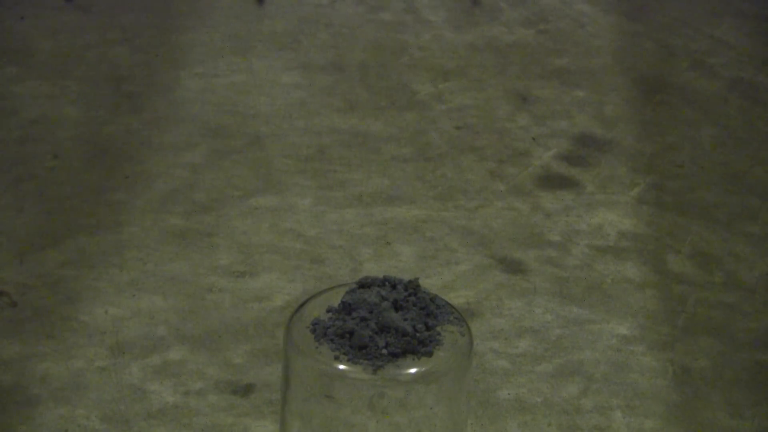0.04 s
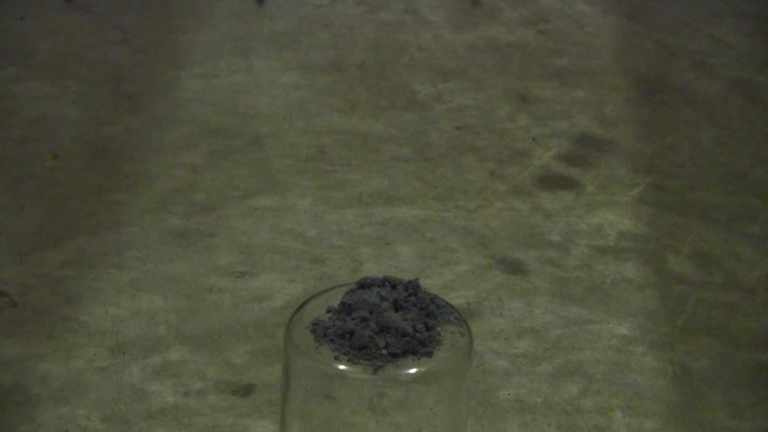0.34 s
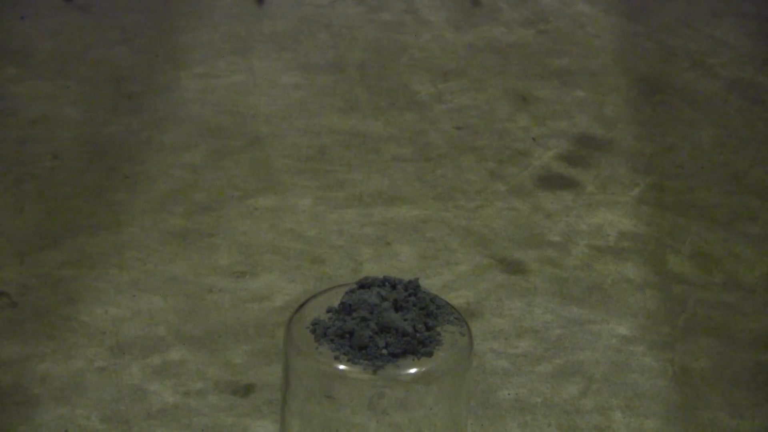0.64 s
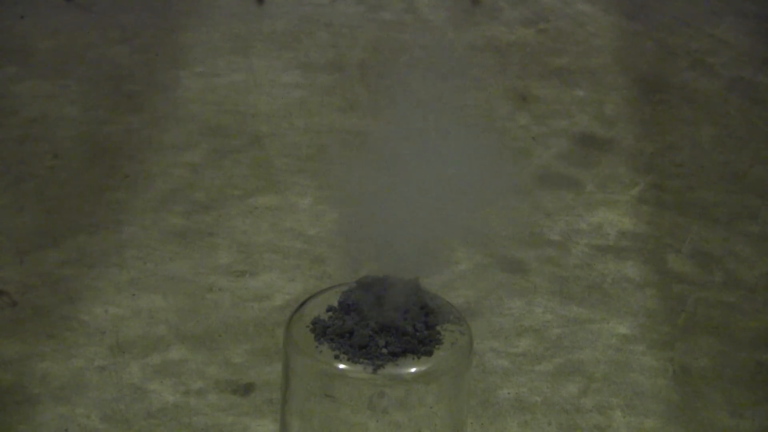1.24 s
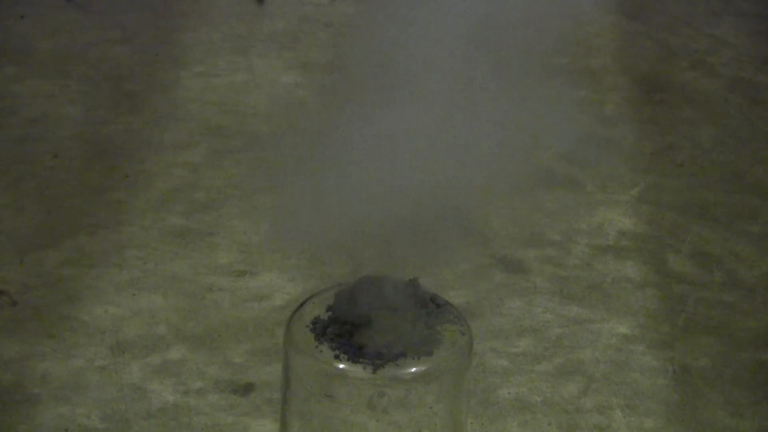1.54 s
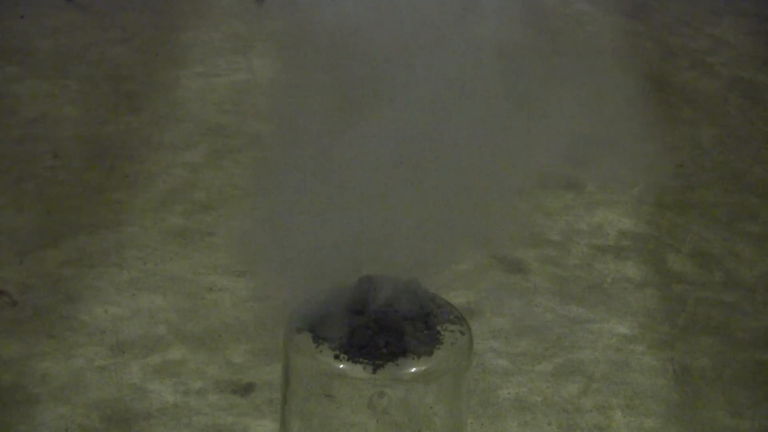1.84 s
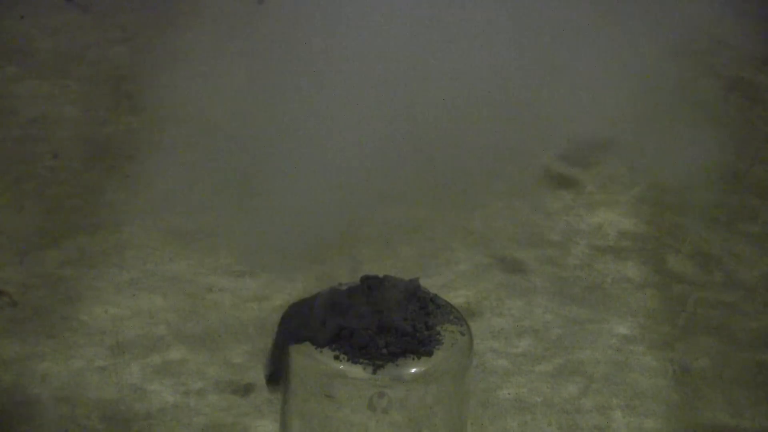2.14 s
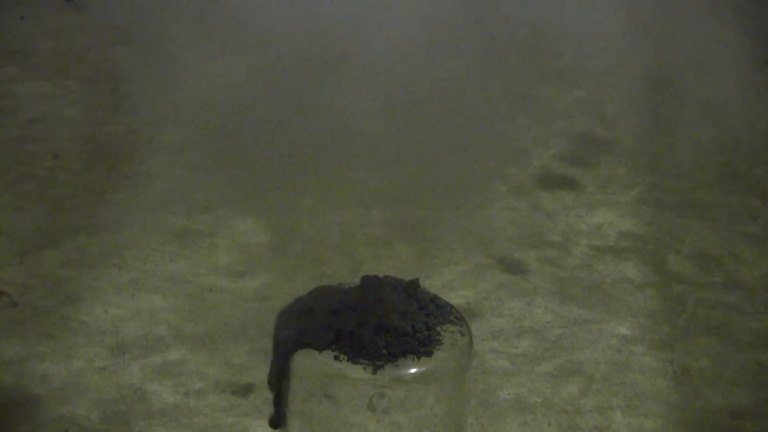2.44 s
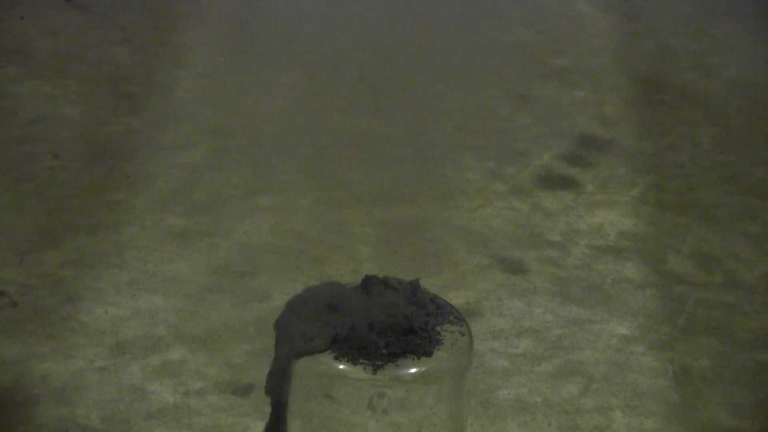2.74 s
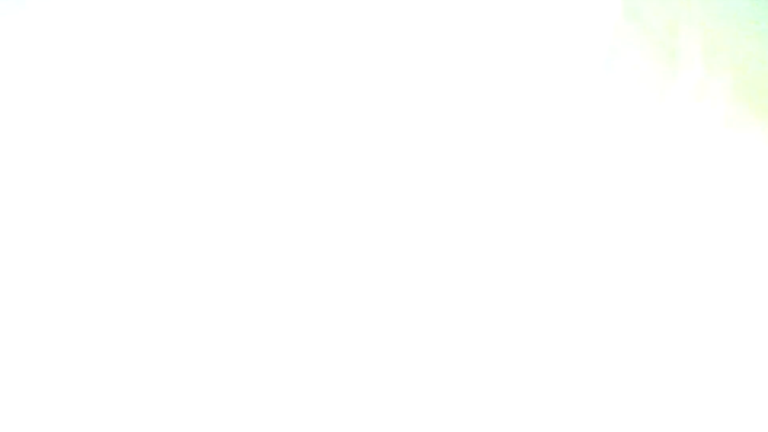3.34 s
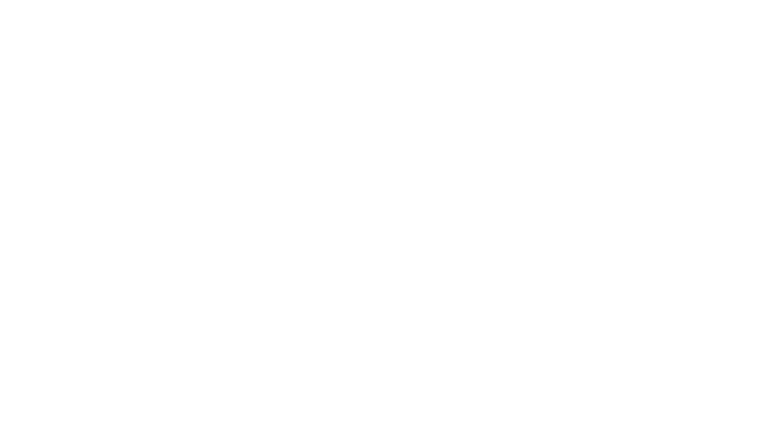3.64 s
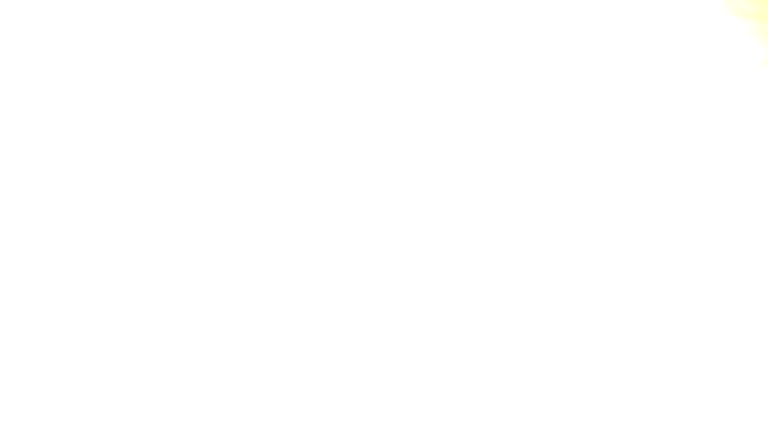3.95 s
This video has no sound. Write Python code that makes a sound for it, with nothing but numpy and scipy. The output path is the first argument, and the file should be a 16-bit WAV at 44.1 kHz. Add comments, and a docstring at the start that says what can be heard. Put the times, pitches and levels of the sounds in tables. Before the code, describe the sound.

Reacting powder sizzles softly and builds, dotted with little pops and one sharp snap. Suddenly it catches fire, rumbling and crackling under a bright rushing hiss. The close walls of a small booth make it sound slightly hollow.

```python
"""A heap of dark powder fizzes and catches fire on an upturned beaker in a hard-walled booth.
Tiny bursting bubbles and escaping vapour grow harder and brighter, dotted with pops and spurts of gas.
At 3.3 s the flame takes over: fluttering turbulence rumbles, roars and spits under a bright jet of hiss,
with a gliding hollow note and one low boom. The booth's resonances and close echoes colour the sound."""
import sys
import numpy as np
from scipy import signal
from scipy.fft import rfft, irfft
from scipy.io import wavfile

SR = 44100
rng = np.random.default_rng(int(sys.argv[2]) if len(sys.argv) > 2 else 0)


def store_wav(level_fs):
    """Save 16-bit WAV to argv[1]."""
    pcm = np.round(np.clip(np.atleast_2d(level_fs), -1, 1) * 32767)
    wavfile.write(sys.argv[1], SR, pcm.T.astype(np.int16))


N = 176400
TIME = np.arange(N) / SR
FREQ = np.maximum(np.arange(N // 2 + 1) * SR / N, 1)
CUTOFF_HZ = 15680

# resonances and hollows of the booth: centre_hz, width_hz, gain_db
BOOTH_MODES = [(166, 35, 5), (415, 26, -6.5), (520, 25, 10), (613, 17, 2), (620, 45, 4), (793, 71, 6),
               (966, 38, 5), (1105, 90, -1), (1605, 230, 4.5), (1950, 280, -2.5), (2374, 67, 6),
               (2890, 200, 2.5), (3040, 150, -5.5), (3530, 130, 3)]


def from_db(db):
    """Decibels to gain."""
    return 10 ** (np.asarray(db) / 20)


def rms_one(x):
    """Scale to rms 1."""
    return x / np.sqrt(np.mean(x ** 2) + 1e-20)


def envelope(rows):
    """Gain over time from rows of time_s, level_db."""
    return from_db(np.interp(TIME, *np.transpose(rows)))


def swell(crest_s, sigma_s):
    """A bell-shaped fade in and out."""
    return np.exp(-((TIME - crest_s) / sigma_s) ** 2 / 2)


def curve(points):
    """Join rows of freq_hz, value on a log frequency axis."""
    hz, value = np.transpose(points)
    return np.interp(np.log(FREQ), np.log(hz), value)


def peaks_db(rows):
    """Resonances and hollows as an EQ curve."""
    return sum(db / (1 + (2 * (FREQ - hz) / width) ** 2) for hz, width, db in rows)


def flutter(rate_hz, depth_db):
    """A random gain that wanders at about the given rate."""
    drift = irfft(rfft(rng.standard_normal(N)) / (1 + (FREQ / rate_hz) ** 2), N)
    return from_db(depth_db * rms_one(drift))


def gas(bursts_per_s, share, spread_db):
    """Smooth turbulence with tiny uneven bursts that carry the given share of its power."""
    sizes = from_db(spread_db * np.minimum(rng.exponential(1, N), 4)) * rng.choice([-1, 1], N)
    bursts = rms_one(sizes * (rng.random(N) < bursts_per_s / SR))
    return np.sqrt(share) * bursts + np.sqrt(1 - share) * rng.standard_normal(N)


def ringing_noise(centre_hz, width_hz):
    """Turbulence ringing in one resonance, whose centre may glide; rms 1."""
    band = irfft(rfft(rng.standard_normal((2, N))) / (1 + (FREQ / width_hz) ** 2) ** 2, N)
    phase = 2 * np.pi * np.cumsum(centre_hz * np.ones(N)) / SR
    return rms_one(band[0] * np.cos(phase) + band[1] * np.sin(phase))


def wall_echoes(x, count=40, near_s=.002, far_s=.02, total_db=-11):
    """Early echoes off the close walls add a fine hollow ripple; rms 1."""
    echoes = np.zeros(N)
    lags = (rng.uniform(near_s, far_s, count) * SR).astype(int)
    echoes[lags] = from_db(total_db) * rng.choice([-1, 1], count) / np.sqrt(count)
    return rms_one(x + irfft(rfft(x) * rfft(echoes), N))


def voiced(drive, colour_db, likeness=None):
    """Give a white source wall echoes, colour and stereo width; rms 1."""
    # default likeness of left and right: freq_hz, correlation
    source_likeness = [(60, 1), (700, 0.96), (2500, 0.95), (5500, 0.8), (8000, 0.66), (10000, 0.46),
                       (12000, -0.041), (14000, 0.63), (15500, -1)]
    # left against right: freq_hz, balance_db
    balance = [(200, 0), (600, -1), (2500, 0), (7000, -0.3), (10000, -2), (12800, 0.8), (15500, 1)]
    alike = np.clip(curve(likeness or source_likeness), -.995, .995)
    mid = np.sqrt(1 + alike) * rfft(wall_echoes(drive))
    side = np.sqrt(1 - alike) * rfft(rng.standard_normal(N))
    channel_eq = from_db(colour_db + curve(balance) * [[.5], [-.5]])
    return rms_one(irfft(np.array([mid + side, mid - side]) * channel_eq, N))


def room_tone(level_db=-56):
    """A quiet, diffuse bed of dull noise."""
    # spectrum of the room: freq_hz, gain_db
    colour = [(25, -25), (60, -17), (130, -5.5), (190, -3.5), (380, 3), (700, 0.5), (1300, -3.5),
              (3000, -16.5), (7000, -27), (15500, -40)]
    # likeness of left and right: freq_hz, correlation
    likeness = [(60, 0.95), (200, -0.53), (1100, -0.44), (3000, 0.14)]
    return from_db(level_db) * voiced(rng.standard_normal(N), curve(colour), likeness)


def spurts():
    """Short, smooth jets of gas swell and fade."""
    # the jets: crest_s, sigma_s, level_db, tilt_db_per_octave
    puffs = [(0.313, .024, -70, 6), (0.367, 0.0016, -56, -1.5), (0.965, 0.017, -48, 1),
             (1.215, 0.022, -46, 2), (1.414, 0.015, -48, -1), (2.286, 0.033, -45, 2.5),
             (2.49, 0.024, -42.5, 4.5), (2.539, 0.015, -36.5, 2.5), (2.887, 0.016, -44.5, -2)]
    # their spectrum before the tilt: freq_hz, gain_db
    colour = [(20, -75), (500, -19), (1000, 1), (1300, 0.5), (2500, -3.5), (4500, -2), (6200, -5.5),
              (8000, -11), (15500, -24.5)]
    out, drive = 0, rng.standard_normal(N)
    for crest_s, sigma_s, db, tilt in puffs:
        rush = voiced(drive, curve(colour) + tilt * np.log2(FREQ))
        out = out + from_db(db) * swell(crest_s, sigma_s) * rush
    return out


def pops(low_cut_hz=132, tail_db=-3, tail_t60_s=.18, size=4096):
    """Gas pockets burst, and after 3.3 s the flame crackles, in heavily damped pulses, each with a short tail
    in the booth."""
    # bursting pockets, and from 3.36 s crackles of the flame: start_s, peak_db, pitch_hz
    snaps = [(0.7978, -31.5, 636), (.797, -37, 273), (0.842, -45, 680), (0.8620, -31.5, 1090),
             (0.863, -42, 400), (0.864, -49, 185), (0.9657, -35, 1230), (0.969, -43, 600),
             (1.072, -37, 493), (1.077, -38, 630), (1.273, -40, 845), (1.272, -47.5, 190),
             (2.502, -45.5, 178), (2.5228, -18, 3840), (2.5248, -23.5, 3300), (2.5236, -22, 5000),
             (2.529, -32, 1230), (3.294, -35, 306), (3.361, -29, 1720), (3.383, -20, 200),
             (3.5093, -15, 1510), (3.683, -20.5, 565)]
    out, click = np.zeros(N + size), signal.unit_impulse(size)
    for start_s, db, hz in snaps:
        ring = signal.lfilter(*signal.iirpeak(hz, Q=2.1, fs=SR), click)
        band = signal.butter(4, [low_cut_hz, min(2 * hz, CUTOFF_HZ)], "band", fs=SR, output="sos")
        pulse = signal.sosfilt(band, ring)
        start = int(start_s * SR)
        out[start:start + size] += from_db(db) * pulse / np.abs(pulse).max()
    tail = rng.standard_normal(N) * from_db(-60 * TIME / tail_t60_s)
    return out[:N] + from_db(tail_db) * signal.fftconvolve(out, tail / np.linalg.norm(tail))[:N]


def fizz():
    """Countless tiny bubbles burst in the wet powder; a finer hiss of vapour grows as it heats."""
    # vigour of the bubbles and of the vapour: time_s, level_db
    bubble_level = [(0, -94), (.26, -73), (.33, -71.5), (.47, -67.5), (.6, -59), (.72, -54), (.9, -52.5),
                    (1.05, -48), (1.3, -46), (2.0, -45), (2.4, -44), (2.95, -46), (3.25, -44), (4, -57)]
    vapour_level = [(0, -108), (.45, -91), (.72, -68), (.9, -63), (1.05, -58), (1.4, -51.5), (2.0, -46.5),
                    (2.45, -43.5), (2.95, -41.5), (3.28, -38.5), (4, -33)]
    # their spectra: freq_hz, gain_db
    bubble_colour = [(60, -35), (150, -16.5), (300, -8.5), (900, -4), (1600, 0), (2600, 1), (4200, -1),
                     (5200, -6), (7000, -11), (10000, -9.5), (16000, -33)]
    vapour_colour = [(1500, -21), (4000, -1), (7200, -3.5), (8500, -1), (10200, 1), (11500, -0.5),
                     (12700, -6), (14000, -10), (16000, -13.5)]
    # resonances and hollows above the beaker: centre_hz, width_hz, gain_db
    resonances = [(770, 59, 4), (1045, 120, -5), (1190, 62, 1.5), (1886, 82, -7), (2650, 92, 4),
                  (2800, 110, -4), (3030, 200, 3), (3320, 220, -3), (3710, 190, 3.5), (4910, 510, -4.5),
                  (6030, 280, 5.5), (8100, 500, 1.5), (9260, 490, -7), (10000, 870, 2.5), (13900, 700, 3)]
    hollow = peaks_db(resonances)
    bubbles = voiced(gas(bursts_per_s=5000, share=.3, spread_db=3), curve(bubble_colour) + hollow)
    vapour = voiced(gas(bursts_per_s=4900, share=.15, spread_db=4), curve(vapour_colour) + .42 * hollow)
    bubbles *= envelope(bubble_level) * flutter(rate_hz=22, depth_db=.5)
    vapour *= envelope(vapour_level) * flutter(rate_hz=16, depth_db=.42)
    return bubbles + vapour


def boom():
    """The first flare sets the booth's low modes ringing; they swell and fade with it."""
    # low modes: pitch_hz, level_db
    modes = [(166, -38.5), (331, -36)]
    ring = sum(from_db(db) * ringing_noise(hz, width_hz=20) for hz, db in modes)
    return swell(crest_s=3.51, sigma_s=.05) * ring


def sparks(centre_hz=2500, width_hz=1400):
    """Sparks crackle in ragged clumps; rms 1."""
    ticks = gas(bursts_per_s=820, share=.82, spread_db=5)
    crackle = irfft(rfft(ticks) / (1 + (2 * (FREQ - centre_hz) / width_hz) ** 2), N)
    return rms_one(crackle * flutter(rate_hz=45, depth_db=2))


def howl():
    """A broad resonance of the flame glides as a hollow note."""
    # path of the note: time_s, centre_hz, level_db against the roar
    glide = [(3.3, 755.4, -11), (3.47, 813, -5), (3.55, 950, -5), (3.615, 830, -3.5), (3.67, 670.6, -6.5),
             (3.76, 720, -18), (4, 620, -11)]
    time_s, hz, db = np.transpose(glide)
    return ringing_noise(np.interp(TIME, time_s, hz), width_hz=154) * from_db(np.interp(TIME, time_s, db))


def rumble():
    """Smooth, low turbulence gives the flame its weight."""
    # sudden onset and hold: time_s, level_db
    level = [(3.29, -74), (3.297, -44), (3.4, -39), (3.475, -36.5), (3.58, -36), (3.68, -40.5),
             (3.76, -38.5), (4, -39)]
    # bass-heavy spectrum: freq_hz, gain_db
    colour = [(25, -39), (50, -18), (90, -2.5), (150, 1.5), (320, 7.5), (450, -1.5), (900, -25)]
    return voiced(rng.standard_normal(N), curve(colour) + peaks_db(BOOTH_MODES)) * envelope(level)


def jet():
    """Grainy gas rushes from the flame in a bright hiss."""
    # surges of the jet: time_s, level_db
    level = [(3.2, -120), (3.3, -60), (3.36, -36.5), (3.45, -34), (3.53, -30), (3.62, -37.5), (3.68, -36),
             (3.73, -29), (3.8, -29.5), (3.86, -26), (3.91, -33.5), (4, -59)]
    # bright spectrum: freq_hz, gain_db
    colour = [(60, -47), (600, -4), (2000, 8), (3800, 6), (5600, 4), (6800, 0.5), (9000, 3), (10400, 5),
              (12500, 1), (14000, -26), (15500, 3)]
    rush = gas(bursts_per_s=4600, share=.2, spread_db=5.5)
    return voiced(rush, curve(colour) + peaks_db(BOOTH_MODES)) * envelope(level)


def flame(sparks_db=-11):
    """The burning heap roars and spits into the booth's resonances; howl and sparks ride on the roar."""
    # flares of the roar: time_s, level_db
    roar_level = [(3.29, -88), (3.298, -36.5), (3.34, -35.5), (3.365, -30), (3.44, -31.5), (3.475, -25.5),
                  (3.495, -29), (3.53, -24), (3.57, -29), (3.65, -30), (3.78, -27), (3.86, -30.5),
                  (3.93, -32), (4, -30)]
    # its midrange spectrum: freq_hz, gain_db
    roar_colour = [(30, -35), (150, -32), (320, 0), (480, -3), (850, -1), (1250, -1), (1900, -6),
                   (2900, -5), (4300, -17), (6500, -23), (15500, -19.5)]
    lows = rumble()
    spitting = gas(bursts_per_s=2500, share=.26, spread_db=3)
    roar = voiced(spitting, curve(roar_colour) + peaks_db(BOOTH_MODES))
    hiss = jet()
    body = lows + (roar + howl() + from_db(sparks_db) * sparks()) * envelope(roar_level)
    return body * flutter(rate_hz=68, depth_db=.64) + hiss * flutter(rate_hz=44, depth_db=1) + boom()


def scene():
    """The reaction over the room tone, in stereo."""
    return room_tone() + fizz() + spurts() + pops() + flame()


def record(dry):
    """A steep low-pass trims the very top."""
    return signal.sosfilt(signal.ellip(12, .1, 80, CUTOFF_HZ, fs=SR, output="sos"), dry)


dry = scene()
out = record(dry)
store_wav(out)
```